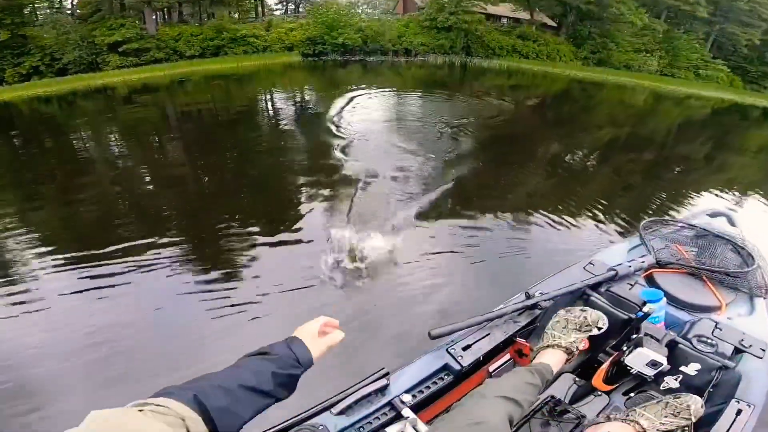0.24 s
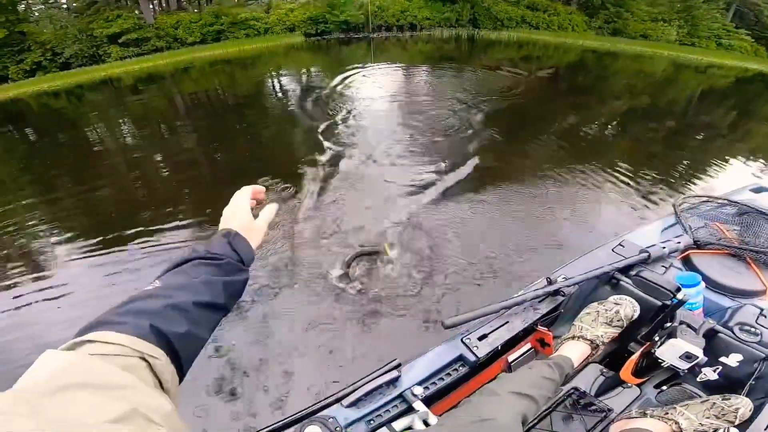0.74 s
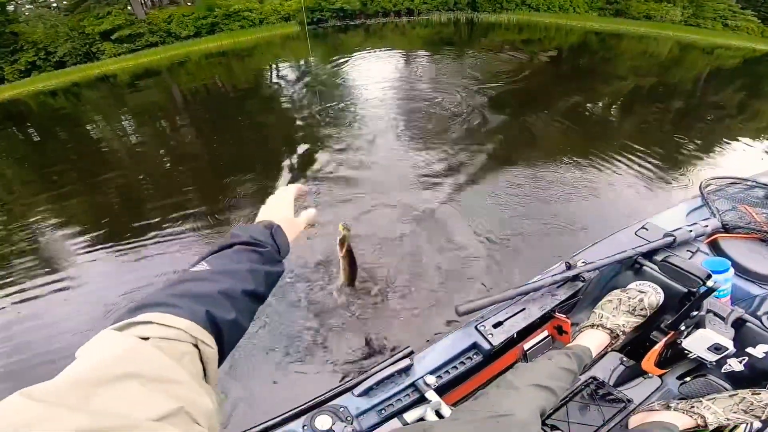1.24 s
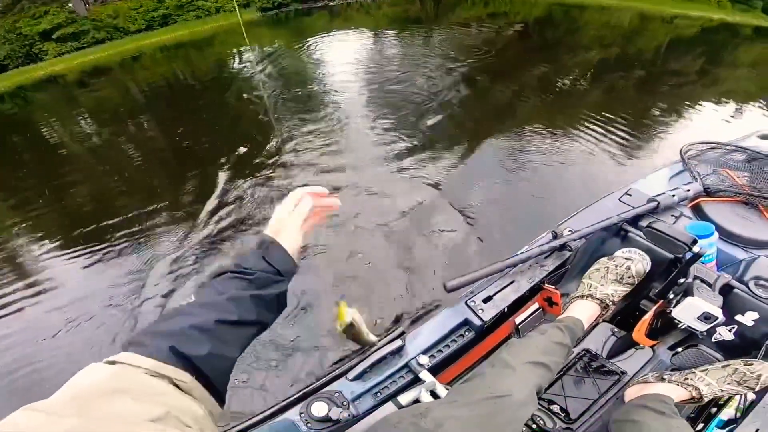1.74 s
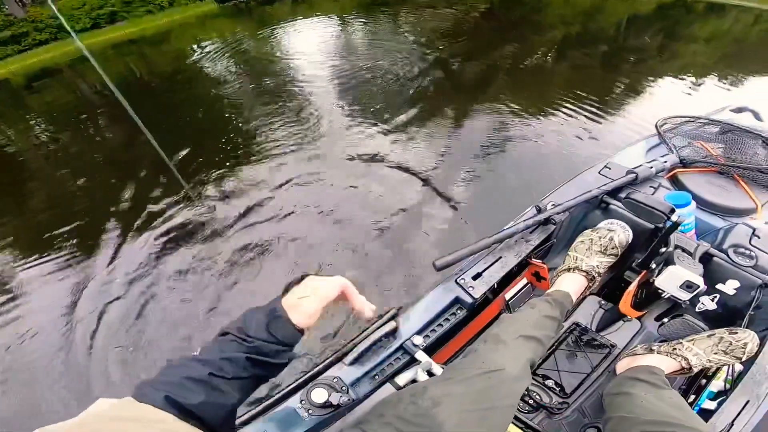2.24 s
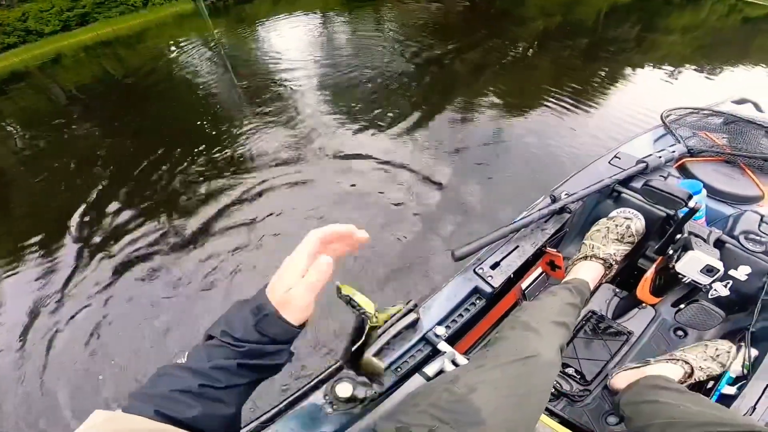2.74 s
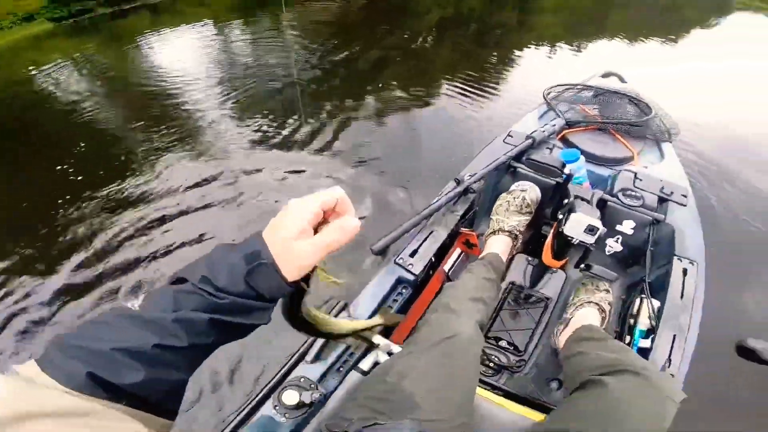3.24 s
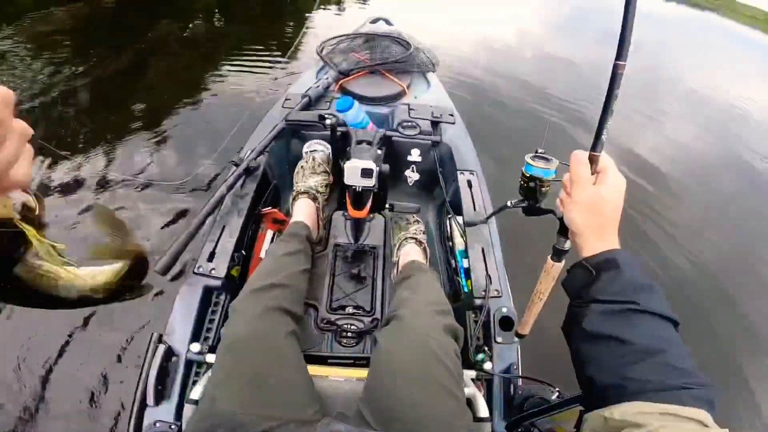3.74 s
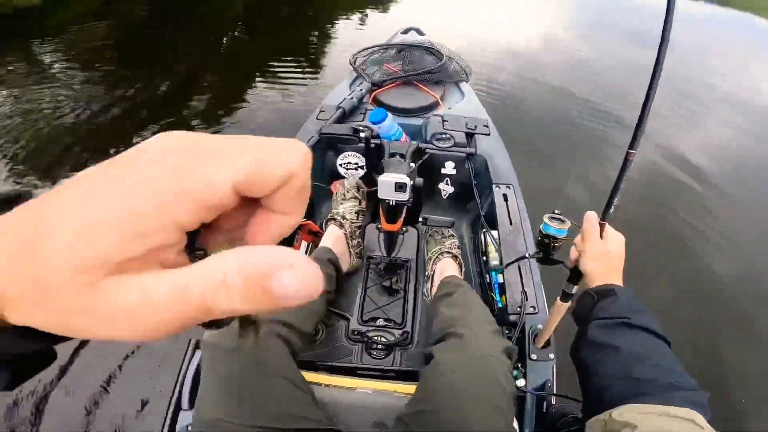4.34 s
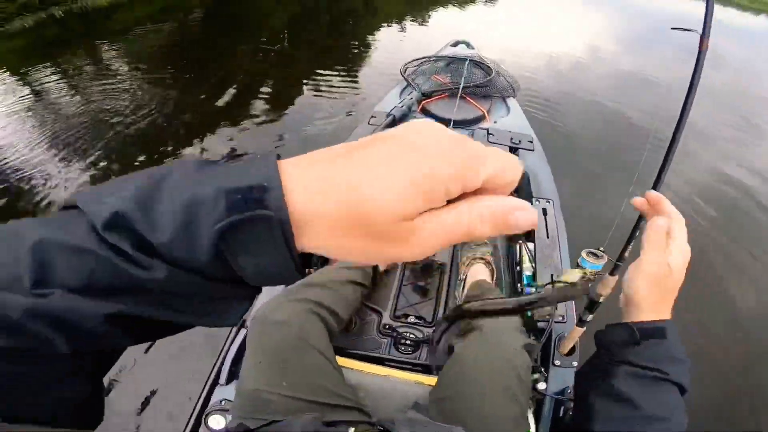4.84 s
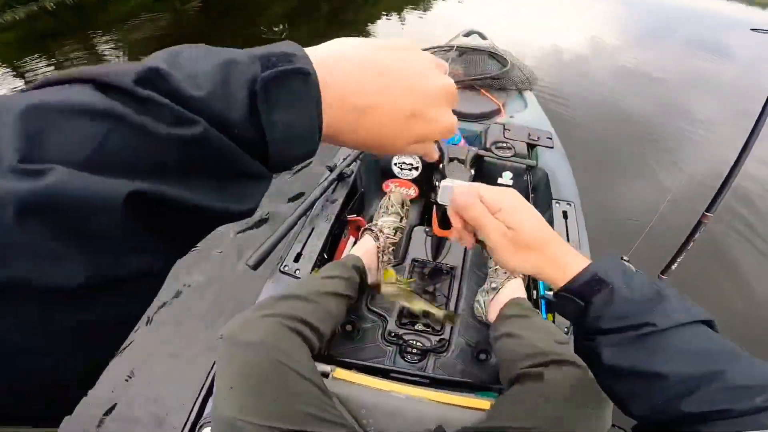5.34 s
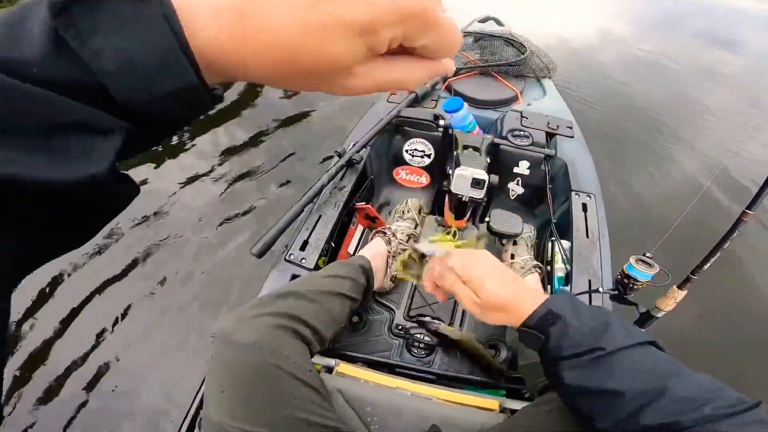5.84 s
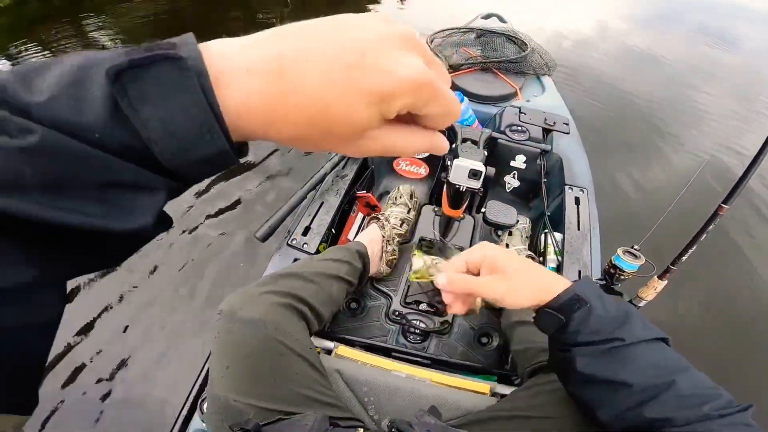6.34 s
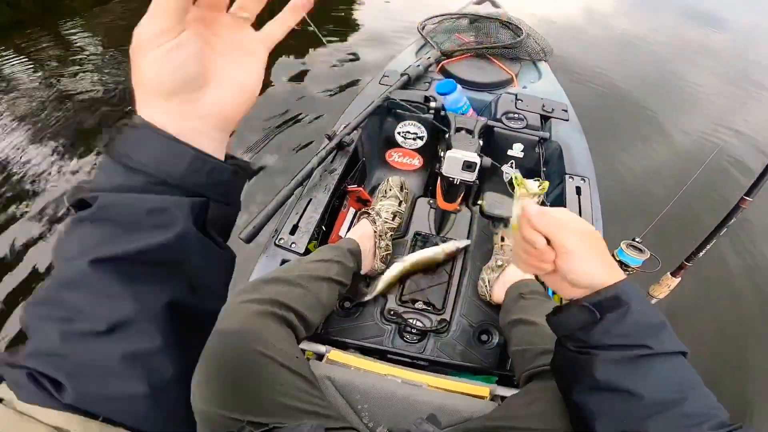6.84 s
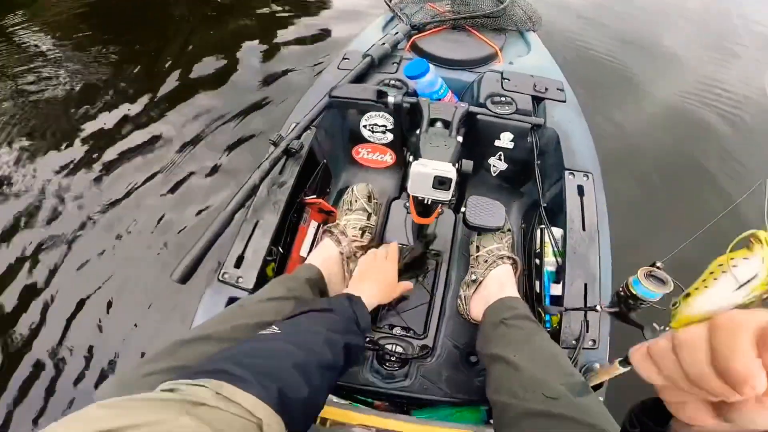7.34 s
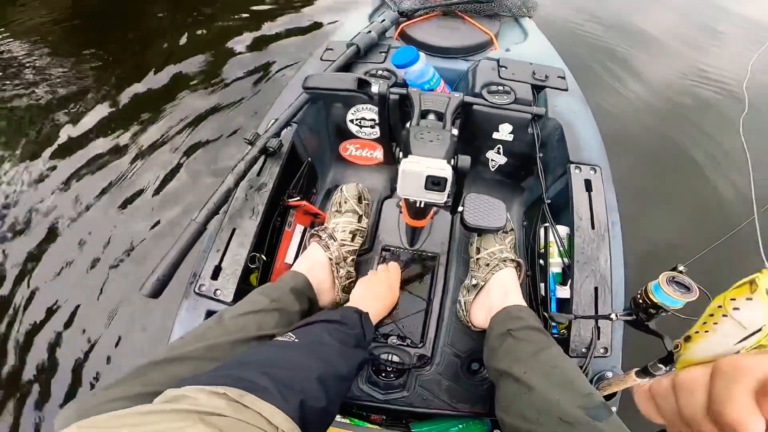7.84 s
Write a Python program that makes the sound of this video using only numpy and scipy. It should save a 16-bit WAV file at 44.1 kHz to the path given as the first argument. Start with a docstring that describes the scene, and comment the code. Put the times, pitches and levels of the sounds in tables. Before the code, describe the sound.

Water splashes and gulps as a small fish is pulled out, then flaps, clicks and hollow thumps on a plastic kayak while birds sing.

```python
"""A small fish is pulled from a pond and thrashes on a plastic kayak, heard at the angler's chest.
A low hum of shaped noise stands throughout. At first water splashes as patchy noise with tiny damped
grains, slaps and ticks crackle as filtered noise bursts, and bubbles gulp as rising damped tones.
After 1 s birds sing from the far bank in gliding sines; from 1.7 s the hollow hull thumps in damped
modes while lure and tackle click and sleeves rustle. A second bird trills just after 5 s."""
import sys
import numpy as np
from scipy import signal
from scipy.fft import rfft, irfft, next_fast_len
from scipy.io import wavfile
from scipy.ndimage import uniform_filter1d, map_coordinates

SR = 44100
rng = np.random.default_rng(int(sys.argv[2]) if len(sys.argv) > 2 else 0)


def file_out(sig):
    """Save sig as 16-bit WAV at sys.argv[1]."""
    # one column per channel
    cols = np.atleast_2d(sig).T
    # limit, then scale
    lim = np.clip(cols, -1, 1)
    pcm = np.round(lim * 32767).astype(np.int16)
    wavfile.write(sys.argv[1], SR, pcm)


N = 356566  # samples


def amp(db):
    """The decibel law: a level in dB to a linear gain."""
    return 10 ** (np.asarray(db) / 20)


def unit(x):
    """Normalization by effective value: scaled to rms 1."""
    return x / np.sqrt(np.mean(x ** 2) + 1e-20)


def peak(x, db):
    """Normalization by crest: scaled to a peak level in dB."""
    return x * amp(db) / np.max(np.abs(x))


def along(points, hz):
    """Log-frequency interpolation of (Hz, value) points."""
    f, v = np.transpose(points)
    return np.interp(np.log(hz + 1), np.log(f + 1), v)


def curves(rows):
    """Linear interpolation in time: one value per sample for each column after the time."""
    seconds, *columns = np.transpose(rows)
    t = np.arange(N) / SR
    return [np.interp(t, seconds, column) for column in columns]


def wobble(rate):
    """Band-limited fluctuation: a smooth random curve with rate knots a second."""
    knots = rng.standard_normal(int(N * rate / SR) + 4)
    return map_coordinates(knots, [np.arange(N) * rate / SR])


def filtered(x, response, pad=8192):
    """Linear filtering: the spectrum of x times a response of frequency."""
    n = x.shape[-1]
    m = next_fast_len(n + pad)
    return irfft(rfft(x, m) * response(np.fft.rfftfreq(m, 1 / SR)), m)[..., :n]


def add(track, s, sound):
    """Superposition: mix a sound into the track at s seconds."""
    part = track[..., round(s * SR):][..., :sound.shape[-1]]
    part += sound[..., :part.shape[-1]]


# Course of the hum. Each row: time in seconds, level in dB.
HUM_COURSE = [(0, -42.5), (.9, -42.5), (1.75, -40), (2.3, -40.5), (4.2, -41), (5.4, -38), (6.3, -41.5),
              (8.09, -40.5)]
# Fuzzy hum tones. Each row: frequency in Hz, width in Hz, relative strength in dB.
HUM_TONES = [(95.9, 9.2, 1.5), (182.8, 10.4, 0.5)]
# Spectrum of the rumble. Each row: frequency in Hz, relative density in dB per Hz.
RUMBLE_SPECTRUM = [(15, -42), (25, -26), (70, -7.5), (130, -11), (230, -12), (300, -15.5), (400, -29),
                   (600, -75)]


def hum():
    """Spectral shaping: noise under a low rumble curve with two resonance-like peaks."""
    def response(hz):
        tones = 0
        for centre, width, db in HUM_TONES:
            skirt = width / np.hypot(width, 2 * (hz - centre)) ** 1.387
            tones = tones + amp(db) * skirt * np.sqrt(width)
        return np.hypot(amp(along(RUMBLE_SPECTRUM, hz)), tones)

    noise = filtered(rng.standard_normal(N), response)
    noise = amp(1.2 * wobble(7)) * noise
    level_db = curves(HUM_COURSE)[0] + 0.4 * wobble(3.15)
    return amp(level_db) * unit(noise)


# Spectrum of the stirring. Each row: frequency in Hz, relative density in dB per Hz.
STIR_SPECTRUM = [(210, -8.5), (350, -1.5), (653, -5.5), (1200, -7.5), (1500, -7), (1790, -8), (2980, -8.5),
                 (3390, -8), (5220, -11.5), (7920, -10.5), (9750, -11.5), (14300, -11.5), (16000, -50)]
# Diffuseness of the stirring. Each row: frequency in Hz, left-right correlation from 0 to 1.
LIKENESS = [(300, 0.9), (640, 0.62), (1400, 0.15), (3100, 0.98), (6800, 0.033), (15000, 0.1)]


def patchy_noise():
    """Partial coherence: a time-frequency mottled noise pair, mixed as mid and side."""
    z = signal.stft(rng.standard_normal((2, N)), nperseg=256)[2]
    field = uniform_filter1d(rng.standard_normal(z.shape[1:]), size=5, axis=0)
    field = uniform_filter1d(field, size=4, axis=1)
    noise = signal.istft(z * amp(2.7 * unit(field)), nperseg=256)[1][:, :N]
    noise = noise * amp(1.5 * wobble(25))

    def mid_side(hz):
        angle = np.arccos(np.clip(along(LIKENESS, hz), -1, 1)) / 2
        return amp(along(STIR_SPECTRUM, hz)) * [np.cos(angle), np.sin(angle)]

    mid, side = filtered(noise, mid_side)
    return np.array([mid + side, mid - side])


def grains(size_db, per_s, centre_hz, spread, cycles):
    """Granular superposition: tiny damped tones at random moments, pitches and sides.

    size_db is read at each grain's moment; spread is the log-pitch deviation."""
    count = int(per_s * N / SR)
    moment, place = rng.random((2, count))
    pitch, size = rng.standard_normal((2, count))
    at, k = (moment * N).astype(int), np.arange(256)
    hz = np.clip(centre_hz * np.exp(spread * pitch), 400, 9000)
    turn = hz[:, None] * k / SR  # cycles elapsed
    gain = amp(size_db[at] + 5.9 * np.clip(size, -2, 2))
    tone = gain[:, None] * np.sin(2 * np.pi * turn) * turn * np.exp(-3 * turn / cycles)
    index = (at[:, None] + k).ravel()
    sides = (1.3 + 0.36 * place, 1.3 - 0.4 * place)
    return np.array([np.bincount(index, (tone * side[:, None]).ravel(), N)[:N] for side in sides])


# Churned water, then cloth and line. Each row: time in seconds, mid-band noise level in dB,
# low-mid noise level in dB, treble noise level in dB.
STIRRING = [(0, -50, -57, -67), (.13, -50.5, -52, -56), (.2, -44.5, -46.5, -46), (.55, -46, -51, -47.5),
            (.66, -45, -51, -53), (.71, -51, -55.5, -53), (.92, -48, -49.5, -58.5),
            (1.1, -63, -57.5, -63.5), (1.3, -60, -57.5, -65), (1.43, -56, -52, -57), (1.6, -59, -57, -64),
            (2.3, -60, -57.5, -65), (2.54, -52.5, -43, -54), (2.79, -63.5, -55.5, -65.5),
            (3.31, -55.5, -53, -55), (4.2, -58, -57, -66), (4.6, -54, -52, -58.5), (5.4, -53, -52, -63),
            (5.6, -47, -44, -55.5), (5.92, -70, -59, -73), (6.15, -50.5, -65, -87),
            (6.35, -61, -57.5, -68.5), (6.93, -57.5, -53.5, -66.5), (7.23, -52, -46.5, -54),
            (7.55, -59.5, -58.5, -71), (7.86, -63.5, -56, -63), (8.09, -51.5, -52, -58.5)]
# Grain size settings (dB) at the reference levels below, and their growth (dB per dB of stirring).
DROP_DB, DROP_GROWS = -39.5, 2.47
GURGLE_DB, GURGLE_GROWS = -45, 2.04
OUT_OF_WATER_S = 1.1  # the gurgling is 8 dB weaker after this


def stir():
    """Turbulent agitation: three noise bands with grains that grow faster than the noise."""
    level_db, low_db, treble_db = curves(STIRRING)
    pair = patchy_noise()

    def low(hz):
        return 1 / (1 + (hz / 1300) ** 4)

    def high(hz):
        return 1 / (1 + (5000 / (hz + 1)) ** 4)

    hiss = amp(low_db) * unit(filtered(pair, low))
    hiss = hiss + amp(treble_db) * unit(filtered(pair, high))
    hiss = hiss + amp(level_db) * unit(filtered(pair, lambda hz: 1 - low(hz) - high(hz)))

    drop_db = DROP_DB + DROP_GROWS * (level_db + 45.0)  # reference -45 dB
    drops = grains(drop_db, per_s=400, centre_hz=2495, spread=0.433, cycles=5.9)
    dry_db = -8 * (np.arange(N) > OUT_OF_WATER_S * SR)
    gurgle_db = GURGLE_DB + GURGLE_GROWS * (low_db + 51.5) + dry_db  # reference -51.5 dB
    gurgle = grains(gurgle_db, per_s=170, centre_hz=719, spread=0.24, cycles=3.46)
    return hiss + drops + gurgle


# Slaps, ticks and clacks. Each row: start in seconds, peak in dB before panning, centre in Hz,
# treble part in dB, low-mid part in dB.
CLICK_EVENTS = [(0.1234, -31.5, 1800, -2, -7), (.144, -23, 1730, -22, -13), (0.1544, -20, 2110, -0.5, -16),
                (0.228, -21.5, 1510, -10, 19), (0.2362, -14, 2140, 3.5, -14), (0.2462, -22, 2370, -17, -3),
                (0.314, -26.5, 1520, -1, 2), (0.354, -30, 2900, -14, 12), (.4451, -16.5, 2330, -58, -30),
                (.489, -22.5, 2820, 0, -22), (0.5103, -25.5, 2410, -17, -18), (0.6317, -28, 2650, -5.5, -2),
                (0.6425, -20, 2920, 0, -2.5), (.7207, -17.5, 3150, 5, -39), (0.7896, -21, 3700, 2.5, -28),
                (0.8023, -20.5, 2800, -22, -23), (0.8683, -19.5, 2370, 0.5, -32),
                (.916, -22.5, 1300, -14, 23), (.9292, -20, 1460, -2, 11), (1.0867, -31.5, 1510, -28, -13),
                (1.1668, -29, 2490, -5, -25), (1.3649, -28, 1920, 5, -17), (1.378, -35, 3800, -5, -10),
                (1.3897, -31, 1720, -17, -15), (1.4152, -24, 1580, -2, 1), (1.4277, -25.5, 1820, -32, -30),
                (1.4414, -31.5, 1880, -9, -1), (1.459, -37, 2640, -14, 4), (1.477, -42, 2400, -10, -5),
                (1.705, -16.5, 4700, -29, -2), (1.8193, -32.5, 2260, 9, 9), (1.8727, -29, 5170, 14, -5),
                (1.9734, -16, 1460, 4.5, -4), (1.98, -23, 2680, -12, -12), (2.383, -36, 2160, -10, -13),
                (2.42, -20, 2800, -23, -28), (2.4616, -16, 3770, -4, -0.5), (2.4727, -13.5, 3540, -0.5, -9),
                (2.4892, -21, 3480, -2, 2), (2.536, -20, 3400, -4, 4), (2.5477, -18.5, 2340, -13, 0),
                (2.582, -26, 3040, 9, -19), (2.6182, -27, 1840, -36, -24), (2.6442, -27, 1270, 3, 12),
                (2.7158, -24.5, 3820, -2, -6), (2.7497, -32.5, 3070, 7, -14), (2.8778, -27.5, 4430, 9, 4),
                (2.8897, -22, 3600, -0.5, -30), (2.9154, -21.5, 5300, 13, 11.5),
                (2.941, -16, 1500, -16, 3.5), (2.9544, -26.5, 1650, -21, 5), (2.9783, -29, 1790, 2, -3),
                (3.0023, -29.5, 4900, -6, 7.5), (3.1451, -26, 3100, -32, -2.5), (3.356, -34, 1820, 6, -8),
                (3.7576, -30, 3200, -20, 18), (3.765, -31.5, 2540, -27, -20), (3.8477, -27, 1380, -16, 33),
                (3.914, -22, 1590, -6.5, -14), (3.954, -27.5, 4300, 9, 2), (3.9773, -27, 3070, -22, 2),
                (4.001, -29, 3370, 0, -4), (4.0297, -29.5, 1320, -30, 28), (4.0925, -25.5, 3100, -34, -4),
                (4.34, -19, 2040, -41, -28), (4.3843, -32.5, 1310, -17, 4.5), (4.415, -31, 1310, -28, -16),
                (4.5193, -27.5, 1750, -30, 3), (4.5324, -27, 2040, -9, -15), (4.5417, -16.5, 2380, 3, 4.5),
                (4.558, -18.5, 3220, -20, -20), (4.5663, -11, 2260, 0.5, -4), (4.579, -15, 1480, 8, -2),
                (4.583, -22.5, 3000, -14, -15), (4.6647, -26.5, 910, -25, 15), (4.6754, -22, 2820, -3, 4.5),
                (4.7251, -19.5, 3280, -35, -2), (4.7345, -20, 2770, -14, -25), (4.971, -26, 3350, 3, -18),
                (5.0254, -31.5, 5650, -10, -5), (5.051, -24.5, 2100, -0.5, -17),
                (5.2742, -27, 1650, 5, -16), (5.3285, -26.5, 2510, -5, 30), (5.3486, -19, 1640, 1.5, -21),
                (5.5221, -13, 3780, 11, 3), (5.551, -30, 3390, -8, -10), (5.5835, -25, 1960, 13, 11),
                (5.712, -21.5, 1680, 6.5, 17.5), (5.784, -32, 1320, -13, -1), (5.797, -12.5, 1100, -20, 15),
                (5.851, -35.5, 3030, -25, 10), (6.096, -19, 1530, -19, 3), (6.107, -24, 1490, -15, 2),
                (6.1422, -18.5, 1660, 16, 22.5), (6.1538, -21.5, 1380, -5, 14), (6.2044, -35, 3260, -16, 3),
                (6.3794, -26.5, 1810, -21, 2.5), (6.417, -35, 3100, -20, 6), (6.474, -34, 3200, -11, 2),
                (6.4966, -15.5, 1430, 12, 10.5), (6.51, -6, 3000, 7.5, -33), (6.8725, -24, 4100, -29, -6),
                (7.0436, -36.5, 1530, -24, 6), (7.145, -30.5, 2820, -8, 8), (7.1712, -19.5, 2270, -9, -4),
                (7.7878, -29, 3460, 4.5, -10), (7.833, -28, 3470, 4, -3), (7.8426, -16.5, 1280, 1, 7.5),
                (7.861, -23, 1510, 5, -16), (7.879, -29, 2800, -10, -2), (7.902, -33, 1420, -20, -5)]
# Where the fish and hands are. Each row: time in seconds, left-right difference of the clicks in dB.
CLICK_SIDE = [(0, 0.5), (1.2, 3), (1.43, -6.5), (1.7, -1), (2.4, -3), (3.4, -4), (3.75, 11.5), (4.0, 7),
              (4.3, 6), (4.58, 1), (4.67, -5), (5.3, -1), (6.1, 0), (8.09, 1.5)]
CRACKLE_T60_S, SNAP_T60_S = 0.038, 0.0058  # the crackle; the sharp first contact
SNAP_DB = 1.5  # first contact relative to the crackle's nominal level


def clicks():
    """Impulsive excitation: ragged noise bursts drive damped resonances, each from its own side."""
    out, t = np.zeros((2, N)), np.arange(SR // 10) / SR
    for s, db, centre_hz, treble_db, low_db in CLICK_EVENTS:
        snap = amp(SNAP_DB - 60 * t / SNAP_T60_S)
        lumps = amp(5.5 * np.repeat(rng.standard_normal(len(t) // 30), 30))
        # wet skin and tackle settle in a ragged tail
        decay = amp(-60 * t / CRACKLE_T60_S) + amp(-21 - 60 * t / 0.11)
        shape = snap + lumps * decay * (1 - np.exp(-t * 30 / CRACKLE_T60_S))
        shared, apart = rng.standard_normal(len(t)), rng.standard_normal((2, len(t)))
        crack = (shared + 0.42 * apart) * shape
        # each contact rings a few small parts near its pitch
        spots = centre_hz * np.exp(0.4 * rng.standard_normal((3, 1)))

        def response(f):
            jf = 1j * f
            body = jf * 0.82 * centre_hz / (centre_hz ** 2 - f * f + jf * 0.72 * centre_hz)
            rings = 0.98 * jf * 0.076 * spots / (spots ** 2 - f * f + jf * 0.087 * spots)
            bright = amp(treble_db) * (jf / 6000) ** 2 / (1 + jf / 6000) ** 3
            dull = amp(low_db) * jf * 700 / (850 ** 2 - f * f + jf * 700)
            return (body + rings.sum(axis=0)) / (1 + jf / 6500) + bright - dull

        pan_db = np.interp(s, *np.transpose(CLICK_SIDE))
        sound = peak(filtered(crack, response, pad=256), db)
        add(out, s, sound * amp([[pan_db / 2], [-pan_db / 2]]))
    return out


# Air pockets closing in the water, gulps low and drips high. Each row: start in seconds, peak in dB
# before the flutter, starting pitch in Hz, decay time t60 in seconds, fractional pitch rise per 10 ms.
AIR_POCKETS = [(0.1417, -31, 1760, 0.021, 0), (.1535, -31, 2030, 0.021, 0.07),
               (.228, -33, 693, 0.029, 0.07), (.244, -24.5, 547, 0.022, 0), (.371, -27, 690, 0.026, 0.06),
               (0.445, -23, 2430, 0.0094, 0.15), (.4574, -32.5, 1910, 0.041, 0.2),
               (.465, -36, 747, 0.05, 0.01), (.602, -37.5, 454, 0.13, 0.11), (.658, -40, 622, 0.098, 0.08),
               (0.8015, -27, 2540, 0.022, 0.2), (0.866, -26, 309, 0.063, .09),
               (.8679, -20, 2150, 0.0077, 0.2), (.917, -31.5, 483, .064, .07),
               (.939, -31, 313, 0.044, 0.12), (1.054, -45, 513, 0.18, 0.08),
               (1.186, -33.5, 1990, 0.015, 0.14), (3.0783, -37.5, 1790, 0.031, 0.05),
               (3.5312, -38, 1600, 0.021, 0.1), (5.4171, -48, 1480, 0.033, .04)]


def bubbles():
    """Bubble resonance: damped tones that rise in pitch as the pocket nears the surface."""
    out, t = np.zeros(N), np.arange(SR // 6) / SR
    for s, db, hz, t60, rise in AIR_POCKETS:
        tone = np.sin(2 * np.pi * hz * (t + 50 * rise * t * t))
        envelope = amp(-60 * t / t60) * (1 - np.exp(-t * 12 / t60))
        add(out, s, peak(tone * envelope, db))
    return out * amp(4.5 * wobble(200))  # the tones break up


# A bird's phrase of four notes: dip, tick, low rise, high rise. Each row of a note: time after the
# phrase start in seconds, pitch in Hz, level in dB relative to the phrase.
PHRASE_NOTES = [
    [(0, 3140, -1), (.021, 2900, 0.5), (.045, 2837, -1.5), (.056, 3000, -10)],
    [(.065, 3206, -6), (.076, 3146, -0.5), (.088, 3110, -8), (.098, 2860, -21)],
    [(.153, 2110, -11), (.172, 2160, -8), (.215, 2240, -10), (.242, 2230, -15)],
    [(.288, 2750, 5), (.303, 2827, -1), (.324, 2920, 4.5), (.337, 3000, -14)],
]
# Sung phrases. Each row: start in seconds, level in dB, time after the start in seconds from which
# no further note begins.
SONG_PHRASES = [(1.085, -53, .4), (1.614, -50, .4), (2.15, -49.5, .4), (2.682, -50, .12),
                (5.787, -55.5, .4), (6.327, -52.5, .4), (6.855, -52.5, .25), (7.4, -56.5, .12)]


def song():
    """Repetition of a motif: the phrase's pitch contours, some of them cut short."""
    notes = []
    for s, db, until in SONG_PHRASES:
        notes += [np.add(note, (s, 0, db)) for note in PHRASE_NOTES if note[0][0] < until]
    return notes


def birds():
    """Frequency modulation: gliding whistles that flutter over the distance, answered by the trees."""
    out = np.zeros(N)
    for note in song() + twitter() + trill():
        s, hz, db = np.transpose(note)
        t = np.arange(s[0], s[-1], 1 / SR)
        tone = np.sin(2 * np.pi * np.cumsum(np.interp(t, s, hz)) / SR)
        envelope = np.sqrt(2) * amp(np.interp(t, s, db)) * signal.windows.tukey(len(t), .3)
        add(out, s[0], envelope * tone)
    out = out * amp(2.5 * wobble(60))
    direct = out * amp([[-.6], [.6]])  # slightly to the right
    t = np.arange(SR // 2) / SR
    trees = rng.standard_normal((2, len(t))) * amp(-60 * t / .9)
    trees = trees / np.linalg.norm(trees[0])
    echo = signal.fftconvolve(out[None], trees, axes=1)[:, :N]
    return direct + amp(-3) * echo


# Blows on the hull. Each row: start in seconds, peak in dB, centre in Hz, hardness in dB.
BLOWS = [(1.717, -18.5, 170, -7.5), (1.777, -27, 177, -23), (1.983, -21, 183, -6), (2.424, -24, 181, 3),
         (2.461, -18, 340, -2), (2.547, -12.5, 327, 4), (2.599, -25.5, 190, -21), (2.946, -21, 260, -14),
         (3.127, -31, 183, -16), (3.852, -13.5, 182, 1.5), (3.87, -18.5, 147, -27), (3.885, -19, 111, -16),
         (3.909, -31, 183, 1), (4.034, -20, 370, 4), (4.568, -26, 185, -22), (4.64, -31.5, 186, 2),
         (4.679, -24.5, 124, -11), (4.728, -28.5, 250, 2), (4.95, -30, 187, 2), (4.981, -17.5, 165, -14),
         (5.054, -23, 304, -8), (5.088, -24.5, 179, -13), (5.151, -31, 167, -1), (5.346, -12, 235, -5.5),
         (5.49, -27.5, 350, -14), (5.521, -14.5, 355, -9), (5.627, -22.5, 144, -9), (5.709, -17, 141, -8),
         (5.795, -14, 232, 1.5), (6.049, -21.5, 414, -1), (6.11, -16, 229, -1), (6.135, -12, 183, -3.5),
         (6.158, -17.5, 218, -1), (6.378, -9.5, 259, -0.5), (6.447, -24.5, 147, -12), (6.499, -11, 176, -9),
         (6.52, -23.5, 205, -2), (6.61, -23, 112, -11), (7.17, -18.5, 230, -5), (7.844, -26, 293, 5)]
# Hull modes, scattered a little at each blow. Each row: nominal frequency in Hz, nominal strength
# in dB, relative ring time.
HULL_MODES = [(55, -3.5, 1.3), (96.7, -7.5, 3.05), (124.6, -0.5, 1.06), (157, -1, 1.42), (185, 4.5, 0.61),
              (221.9, 4.5, 1.05), (271.4, 4.5, 0.6), (307, 2, 0.95), (348.5, 2.5, 0.9), (381, 3.5, 0.68),
              (442, 6.5, 0.65), (512, 0.5, 0.64), (614.5, 3, 0.4), (794, 11, 0.2), (998, 6.5, 0.16)]
HULL_T60_S = 0.1  # ring time of a mode with relative time 1
UPPER_HZ = 450  # hardness raises the hull modes above this
MODE_SCATTER = 0.65  # deviation of starting phase in radians


def thumps():
    """Modal superposition: a blow rings the modes near its centre, a hard one the upper modes too."""
    out, t = np.zeros(N), np.arange(SR // 4) / SR
    hz, mode_db, life = np.transpose(HULL_MODES)[:, :, None]
    slow, quick = amp(-60 * t / (HULL_T60_S * life)), 0.5 * amp(-60 * t / 0.012)
    decay = (slow + quick) * (1 - np.exp(-(t / 0.0066) ** 2))
    for s, db, centre_hz, hard_db in BLOWS:
        strength_luck, pitch_luck, phase_luck = rng.standard_normal((3, len(HULL_MODES), 1))
        near = amp(-10.5) * (hz < centre_hz) + amp(-9 * np.log2(hz / centre_hz) ** 2)
        reach = np.hypot(near, amp(hard_db) * (hz > UPPER_HZ))
        strength = amp(mode_db + 3 * strength_luck)
        mode_hz = hz * (1 + 0.016 * pitch_luck)
        tone = np.cos(2 * np.pi * mode_hz * (t - .004) + MODE_SCATTER * phase_luck)
        ring = strength * reach * decay * tone
        add(out, s, peak(ring.sum(axis=0), db))
    return out


# Loose notes, many of them the singing bird's own, some from other birds. Each row: start in seconds, # length
# in seconds, first pitch in Hz, last pitch in Hz, mid-note level in dB.
LOOSE_NOTES = [(3.221, 0.087, 2330, 2290, -61), (4.432, 0.029, 3800, 4100, -53),
               (4.8, 0.029, 3600, 3280, -61), (4.861, 0.025, 3900, 4700, -57),
               (4.89, .035, 5400, 5450, -63), (5.673, 0.077, 2840, 3050, -56),
               (5.747, .04, 2305, 2490, -59), (5.87, 0.042, 3450, 3530, -54.5),
               (5.905, .025, 3620, 3170, -52), (5.983, 0.068, 2800, 3180, -57),
               (6.047, 0.055, 3210, 3320, -51), (6.296, 0.04, 3700, 3150, -62),
               (6.39, .035, 3240, 3200, -56), (6.528, .045, 2240, 2170, -62), (6.68, .045, 2900, 2290, -56)]
NOTE_EDGE_DB = -5  # notes swell from and sink to this, relative to mid-note


def twitter():
    """Linear glide: each loose note moves evenly in pitch and swells to its middle."""
    notes = []
    for s, length, first_hz, last_hz, db in LOOSE_NOTES:
        start = (s, first_hz, db + NOTE_EDGE_DB)
        middle = (s + length / 2, (first_hz + last_hz) / 2, db)
        end = (s + length, last_hz, db + NOTE_EDGE_DB)
        notes.append([start, middle, end])
    return notes


# Falling sweep of the trill. Each row: time after the start in seconds, pitch in Hz, level in dB.
TRILL_SWEEP = [(0, 4790, -57), (.01, 4010, -52), (.022, 3100, -59)]
# Nearly level note after it. Each row: time after the start in seconds, pitch in Hz, level in dB.
TRILL_HOLD = [(.032, 3950, -63), (.043, 4060, -49), (.056, 4150, -66)]
# Trill repeats. Each entry: start in seconds.
TRILL_STARTS = [5.083, 5.168, 5.258, 5.342, 5.425, 5.509, 5.597]


def trill():
    """Rapid reiteration: a second bird repeats a falling sweep and a nearly level note."""
    return [np.add(note, (s, 0, 0)) for s in TRILL_STARTS for note in (TRILL_SWEEP, TRILL_HOLD)]


def scene():
    """Linear superposition of all sources at the chest."""
    return hum() + stir() + clicks() + bubbles() + birds() + thumps()


# Shading by the body. Each row: frequency in Hz, left-right level difference in dB.
PORT_LEAN = [(350, 0.5), (700, -4.5), (1300, -3), (2400, -2.5), (4400, -0.5), (8100, -0.5), (15000, -2)]
# Roll-off of the ports. Each row: frequency in Hz, gain in dB.
PORT_RESPONSE = [(6000, 0), (8000, -3), (9700, -2), (11000, -13), (13000, -15), (15800, -28)]
# Phase between the ports. Each row: frequency in Hz, lead of the left port in radians.
PORT_LEAD = [(6500, 0), (8300, -2.1), (10500, -1.4), (12000, 1.5)]
TOP_HZ = 15850  # band limit


def record(dry):
    """Diffraction and phase: the body shades the left port's middle range, the treble falls out of step.

    The top rolls off to the band limit."""
    def ports(hz):
        gain_db = np.outer([.5, -.5], along(PORT_LEAN, hz)) + along(PORT_RESPONSE, hz)
        phase = np.outer([.5, -.5], along(PORT_LEAD, hz))
        return amp(gain_db) * np.exp(1j * phase) * (hz < TOP_HZ)

    return filtered(dry, ports)


dry = scene()
out = record(dry)
file_out(out)
```